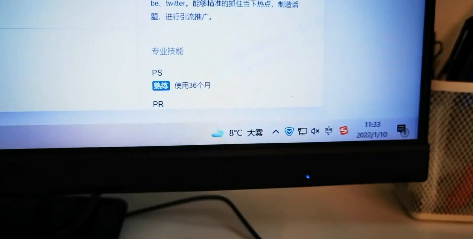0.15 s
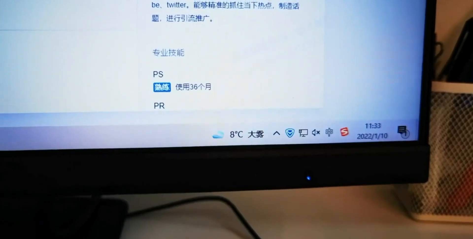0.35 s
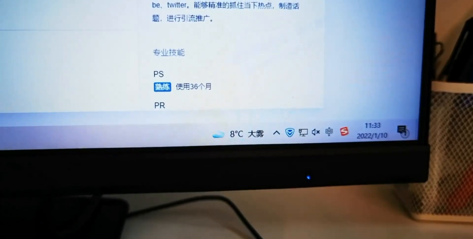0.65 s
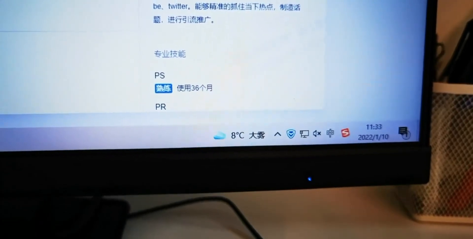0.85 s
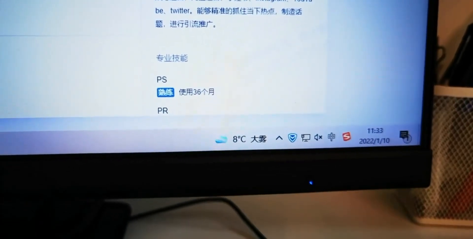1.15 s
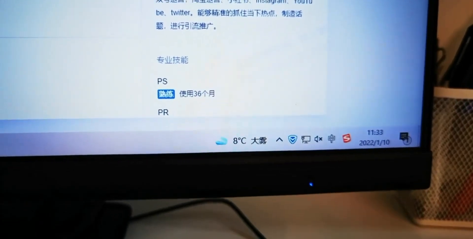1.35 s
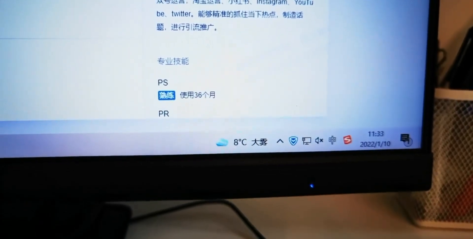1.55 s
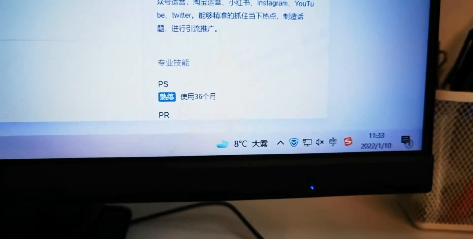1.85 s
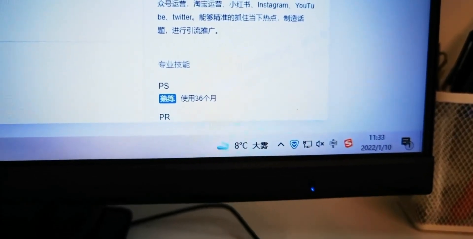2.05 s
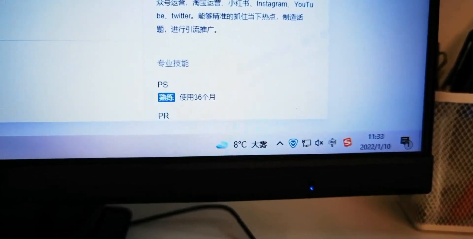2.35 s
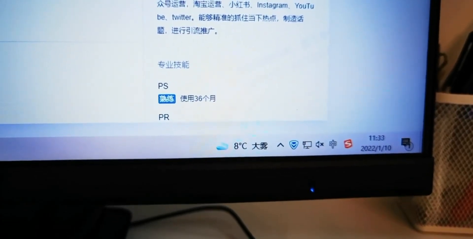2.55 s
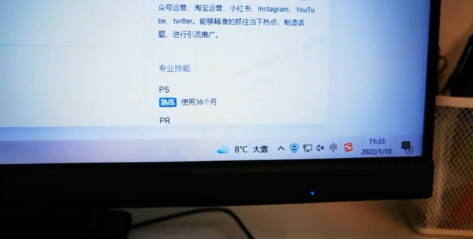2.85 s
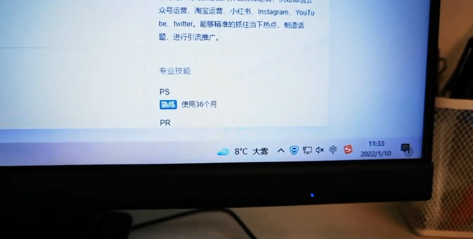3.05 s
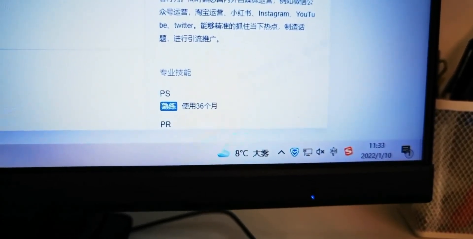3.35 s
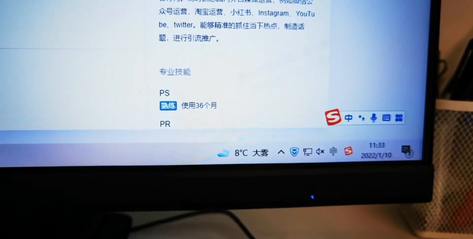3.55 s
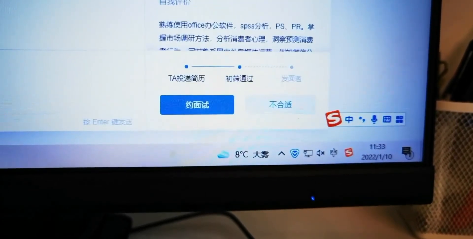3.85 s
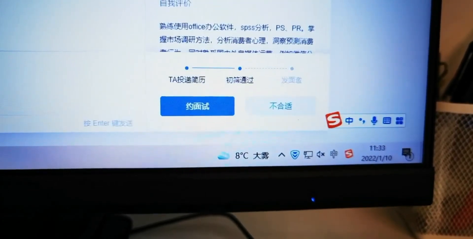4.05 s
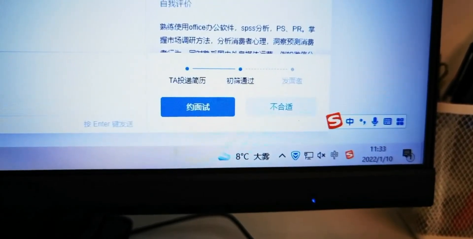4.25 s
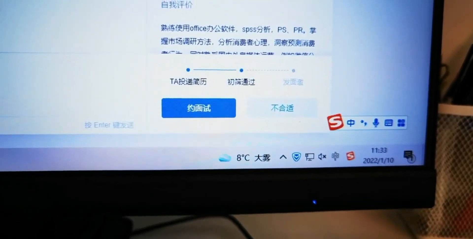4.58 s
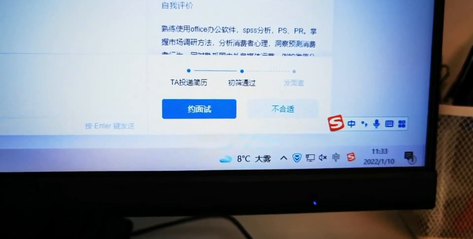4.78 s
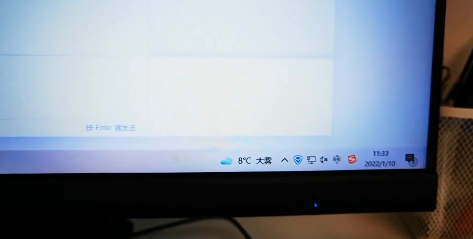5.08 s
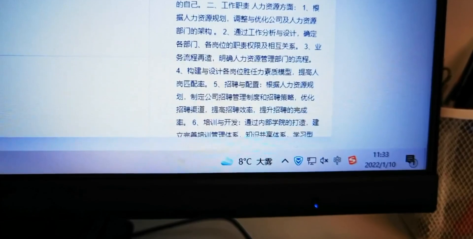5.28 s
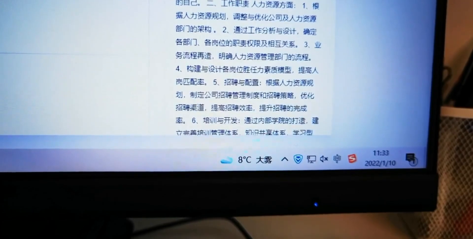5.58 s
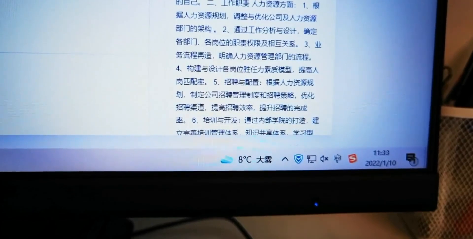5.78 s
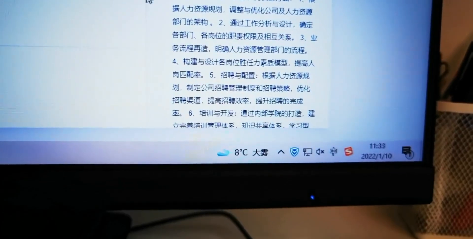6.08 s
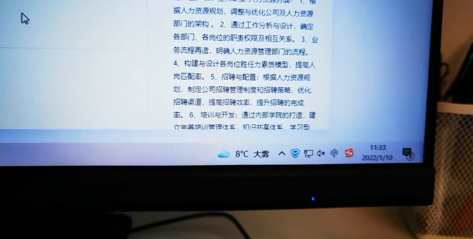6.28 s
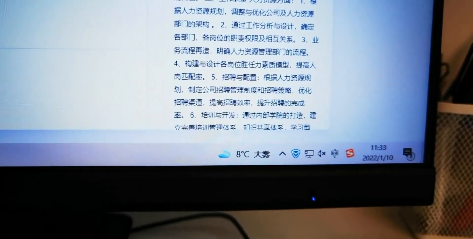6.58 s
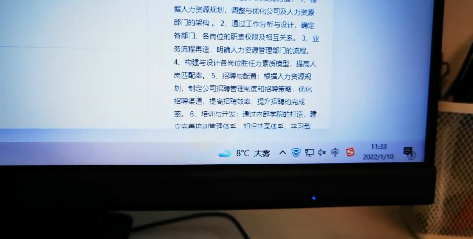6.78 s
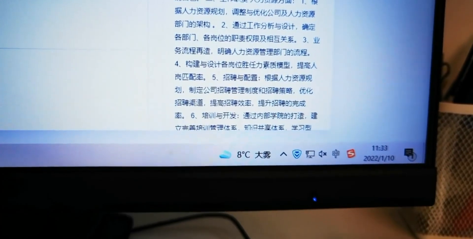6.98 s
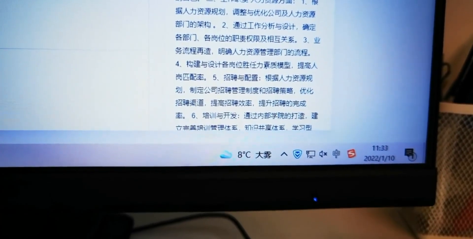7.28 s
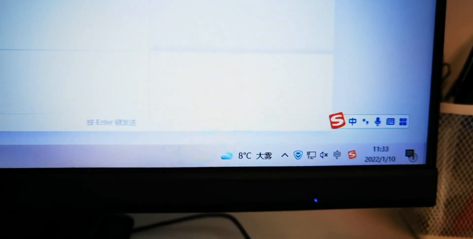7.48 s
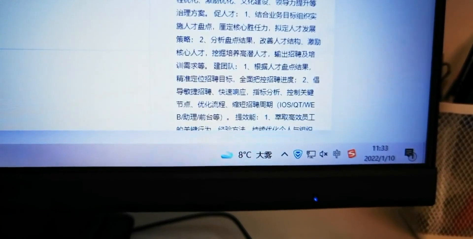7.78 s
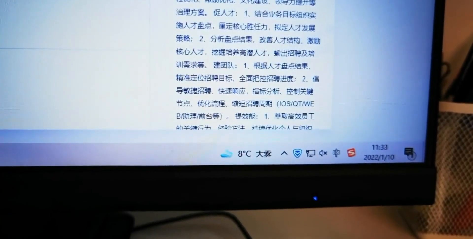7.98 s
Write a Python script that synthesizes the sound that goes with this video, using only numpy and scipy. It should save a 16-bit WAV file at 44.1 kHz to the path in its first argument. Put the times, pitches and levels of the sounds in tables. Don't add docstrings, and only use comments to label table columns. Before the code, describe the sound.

Four sharp computer mouse clicks, evenly spaced about two seconds apart, with soft sliding on a desk over a low steady office hum.

```python
import sys
import numpy as np
from scipy import signal
from scipy.io import wavfile
from scipy.ndimage import uniform_filter1d, minimum_filter1d

SR = 44100
rng = np.random.default_rng(int(sys.argv[2]) if len(sys.argv) > 2 else 0)


def int16_out(signal):
    q = np.round(np.clip(np.atleast_2d(signal).T, -1, 1) * 32767)
    wavfile.write(sys.argv[1], SR, q.astype(np.int16))


def amplitude_ratio(level_db):
    exponent = np.asarray(level_db, float) / 20
    return 10 ** exponent


N = 358488

# f/Hz, level/dB per Hz
AIR_SPECTRUM = [(20, -24), (45, -11.5), (70, -14), (100, -3), (220, -8), (330, -9), (600, -25.5),
                (800, -24), (1300, -30.5), (3800, -39), (6400, -39.5), (8700, -32), (11300, -42.5),
                (13000, -57), (15600, -54)]
# t/s, level/dB
AIR_LEVEL = [(0.45, -53.5), (0.55, -52), (1.15, -55), (1.37, -51.5), (2.01, -54.5), (2.76, -53.5),
             (2.86, -54.5), (4.87, -56), (4.98, -56), (6.86, -55), (6.98, -56.5), (8.12, -57.5)]
# f/Hz, width/Hz, level/dB
HUM = [(46.8, 15, -67), (99.6, 9, -60), (162.5, 6.4, -63), (258.3, 6.8, -72), (412, 25, -73),
       (516, 5.4, -74), (552.5, 6.6, -81), (681, 26, -84), (808, 30, -84)]
# f/Hz, correlation/1
PORT_LIKENESS = [(30, .93), (170, .93), (400, .82), (800, .5), (1200, .3), (5400, .12), (6900, .88),
                 (8400, .98), (15000, .98)]
# f/Hz, phase/rad
PORT_LAG = [(20, 0), (200, 0), (300, .3), (500, 1.1), (800, 1.3), (1100, 2.8), (2400, 6.28), (16000, 6.28)]
# f/Hz, left-right/dB
AIR_TILT = [(60, -7), (150, 1.5), (380, -1), (950, -1.5), (2380, 1), (5980, 4), (15000, -4.5)]
# f/Hz, t60/s
OFFICE_T60 = [(2000, 0.59), (5000, 0.23), (8400, 0.24), (11000, 0.21), (14000, 0.22)]

# t/s, half width/s, level/dB
BOOMS = [
    (1.27, .06, -56),
    (1.43, 0.12, -54.5),
    (2.25, .15, -59.5),
    (5.25, .08, -60),
    (6.6, 0.096, -63.5),
]
# f/Hz, width/Hz, level/dB
DESK_MODES = [(110, 80, 1.5), (300, 230, -4)]

# t/s, length/s, rub level/dB, dull part under it/dB, left-right/dB
STROKES = [(-.1, .3, -69, -5, 3), (0.311, 0.26, -67.5, -11.5, 9.5), (0.485, 0.52, -80.5, -0.5, 2),
           (0.872, 0.25, -80, 5.5, 0), (1.091, 0.095, -65, -6, 3.5), (1.128, 0.4, -62.5, -14.5, 12),
           (1.397, 0.1, -67.5, -11.5, 20), (1.515, 0.078, -78.5, -12.5, 12.5), (1.71, 0.58, -82, -6, 7),
           (2.043, 0.51, -58.5, -9.5, 5), (2.658, 0.35, -79.5, -9, 5), (3.075, 0.28, -61.5, -13.5, 13),
           (3.395, 0.22, -74.5, -12, 2), (3.584, 0.17, -80, -4.5, 7.5), (3.793, 0.34, -95.5, 1, 4.5),
           (4.357, 0.32, -87, -3, 1), (4.8, 0.23, -86.5, 0.5, -0.5), (5.134, 0.12, -66, -2.5, 0.5),
           (5.566, 0.27, -70, -6.5, 4.5), (6.068, 0.36, -61.5, -16.5, 11.5), (6.364, 0.3, -67, -5.5, 6.5),
           (6.506, 0.41, -64, -7, 3.5), (6.928, 0.12, -85.5, -2, 3), (7.132, 0.14, -63, -8.5, 3.5),
           (7.331, 0.28, -73.5, -19.5, 3.5)]
# t/s, level/dB
CATCHES = [(.892, -68), (1.958, -72), (3.11, -69), (4.544, -68), (4.776, -85.5), (5.306, -71),
           (6.012, -80.5), (6.562, -56.5), (6.598, -63.5), (7.214, -60), (7.825, -71), (7.933, -69),
           (2.915, -66), (5.026, -60.5), (7.005, -66), (.996, -66.5)]
# f/Hz, width/Hz, level/dB
RUB_MODES = [(7230, 310, -2.5), (7710, 170, -0.5), (8685, 1200, 4.5), (10000, 4500, -22.5),
             (11200, 450, -28), (14050, 1557, -41)]
# f/Hz, width/Hz, level/dB
DULL_RUB_MODES = [(5320, 490, 4.5), (6020, 970, 2), (5200, 1200, -20.5), (2420, 9500, -9)]
# f/Hz, width/Hz, level/dB
SQUEAK_MODES = [(5760, 160, 0), (6450, 300, -11), (5400, 400, -10)]
STROKE_SKEW, STROKE_ROUND = 0.71, 1.69
CATCH_S = 0.0055
SQUEAK_S, SQUEAK_WIDTH_S, SQUEAK_DB = 3.665, .055, -69.5
REST_DB, REST_DULL_DB, REST_PAN_DB, TREMBLE_DB = -84.5, 1.5, 4, 1.5
FLUTTER_DB, FLUTTER_S = 3, .02
RUB_TOP_HZ = 11400

# t/s, f/Hz, width/Hz, peak level/dB, t60/s
RINGS = [
    (1.092, 5300, 1100, -53.5, 0.4),
    (3.022, 5260, 1100, -54.5, 0.39),
    (5.13, 5440, 1500, -50, 0.35),
    (7.123, 5280, 630, -52.5, 0.38),
    (2.9265, 8450, 500, -26, 0.047),
    (2.933, 8450, 500, -41.5, 0.45),
    (1.092, 8800, 1230, -47.5, .4),
    (3.022, 8900, 1000, -45.5, .4),
    (5.033, 2950, 300, -67, .2),
    (1.03, 8350, 600, -46, 0.26),
]
# t/s, f/Hz, width/Hz, peak level/dB, t60/s
FIZZ = [
    (1.092, 12500, 2500, -62, .15),
    (2.929, 13800, 2600, -56, .16),
    (3.02, 13200, 2500, -56, .13),
    (5.034, 12000, 2000, -64, .1),
    (5.128, 13200, 2500, -62, .1),
    (7.015, 13300, 2800, -54, .14),
    (7.122, 13500, 2500, -58, .13),
    (2.1, 14200, 1500, -78, 2.5),
    (7.2, 12800, 2000, -68, .25),
    (6.41, 14500, 1800, -79, 2.5),
]
RING_RISE_MS = 1.3

# t/s, peak level/dB, ring under it/dB, ring t60/s
THUDS = [(.472, -64, -20, .1), (1.0004, -59, -5, 0.22), (1.343, -66, -22, 0.091), (1.565, -64, -20, .1),
         (2.923, -54.5, -2, 0.27), (3.0132, -58, -10, 0.35), (3.088, -63, -15, 0.11),
         (4.774, -65.5, -7, 0.15), (5.028, -53, -1, 0.34), (5.1217, -69, -20, .2), (5.725, -66, -13, .1),
         (6.011, -72.5, -21, 0.091), (6.3948, -57.5, -15, .15), (7.008, -58, -3, 0.34),
         (7.115, -64, -14, 0.17)]
# t/s, peak level/dB, shell share/dB, lever share/dB
FLICKS = [(1.2, -62.5, -5, 25), (1.0728, -62.5, -5, 27), (0.98, -67, -5, 27), (7.0132, -33.5, 6, 30),
          (7.8, -53, 2, 23), (1.0995, -48, 0, 1), (3.3, -62, -5, 28.5), (7.1125, -43.5, 4.5, 6),
          (7.1142, -35, 4, 7), (7.1208, -34, 8, 3), (5.0225, -59.5, 0.5, 22.5), (7.0205, -42, -5, -5.5),
          (2.9345, -39.5, -5, 3), (7.2165, -46.5, 4, 8)]
# f/Hz, width/Hz, level/dB
HOLLOW_MODES = [(3220, 880, -2.5), (1900, 1200, -10.5), (3900, 1900, -3.5), (1208, 890, -6.5)]
THUD_MS = 3.1

# f/Hz, width/Hz, level/dB
SWITCH_MODES = [(8370, 450, 4), (8814, 1040, -3.5), (9770, 2300, -19.5), (8020, 1600, -4)]
# f/Hz, width/Hz, level/dB
SHELL_MODES = [(4886, 410, -17), (5580, 2300, -18.5), (6420, 2400, -17.5), (6930, 440, -26),
               (2914, 209, -34.5)]
# f/Hz, width/Hz, level/dB
LEVER_MODES = [(11220, 570, -28.5), (13140, 960, -38.5), (13890, 2000, -44.5), (15300, 1200, -49.5)]
SMALL_PARTS_HZ = 4550
LEAD_IN_S = .003

# t/s, peak level/dB, shell share/dB, left-right/dB, lever share/dB
TICKS = [(0.2696, -49.5, 10.5, 10, -16.5), (0.4714, -39.5, 12, 16, 4.5), (1.1537, -46, 18, 6, 12),
         (1.2303, -53, -3, 12.5, -13), (1.3435, -35, 3, 16, 17.5), (1.379, -43, -1, 21, -11.5),
         (1.3998, -53, 2, 18, -8), (1.5647, -36.5, 9, 8, -14), (1.958, -64, 6.5, 4, -3),
         (3.0899, -33, 22.5, 14.5, -9), (4.5438, -63, 5, 2, -2.5), (4.7742, -56, 8, 23, -3),
         (5.6242, -58, 13, 9, -6), (5.727, -43.5, 8, 10, -11.5), (6.011, -53.5, 7, 9.5, 3),
         (6.3942, -34.5, 11, 15, -4), (6.5702, -33, 5, 11.5, -12), (7.219, -38, 6.5, 9, -1),
         (7.424, -56, 10, 26, -1.5)]
TICK_MS = 1.42

# t/s, peak level/dB, shell under switch/dB, lever under switch/dB
BOUNCES = [(1.0837, -19, -15, -36), (1.0846, -19, -5, -29), (1.0855, -15, -13, -30),
           (1.0868, -10, -16, -42), (1.0874, -14, -16, -36), (1.0883, -17, -14, -39),
           (1.0896, -29, -18, -40), (3.0139, -22, -9, -19), (3.015, -14, 0, -23), (3.0159, -10, -19, -32),
           (3.0166, -14, -12, -23), (3.0179, -16, -16, -31), (3.0194, -21, -18, -35),
           (3.0206, -22, -27, -41), (3.0218, -29, -16, -34), (5.121, -29, -22, -25),
           (5.1223, -28, -13, -22), (5.1231, -15, -22, -27), (5.1239, -12, -21, -24),
           (5.1246, -11, -12, -27), (5.1258, -10, -19, -31), (5.1277, -19, -14, -37),
           (5.1298, -30, -22, -38), (7.1165, -22, 3, -19), (7.1174, -10, -12, -31), (7.1188, -24, -2, -21),
           (7.1198, -23, -15, -21), (6.3952, -21, -4, -35), (6.3959, -26, 2, -27), (6.3982, -32, -12, -46),
           (6.5697, -31, -24, -26), (6.5715, -20, -10, -27), (6.5722, -16, -15, -37),
           (6.5729, -21, -25, -42), (6.5746, -29, -18, -33), (6.5762, -37, -25, -34),
           (2.9221, -22, -4, -31), (2.9232, -21, -1, -18), (7.0066, -44, -16, -25), (7.0084, -27, 0, -24)]
# f/Hz, width/Hz, level/dB
CONTACT_SWITCH = [(8450, 1600, 0), (9700, 1800, -6.5)]
# f/Hz, width/Hz, level/dB
CONTACT_SHELL = [(5100, 950, 0), (6300, 1500, -4.5)]
# f/Hz, width/Hz, level/dB
CONTACT_LEVER = [(11300, 1600, 0), (13600, 3000, -4.5)]
BOUNCE_TRIM_DB, BOUNCE_SHELL_DB, BOUNCE_LEVER_DB, BOUNCE_PAN_DB = -6.5, 1.5, 4.5, 12.5
BOUNCE_RISE_S, FAR_PORT_S = .0002, .00016

# t/s, peak level/dB, shell share/dB, lever share/dB, time factor/1
RELEASES = [
    (1.084, -35, 7, -2, 0.9),
    (3.0135, -25, 3, 6, 1.5),
    (5.1227, -24, 0.5, 4, 1.15),
    (7.1161, -32, -3, 4.5, 0.6),
]
# f/Hz, width/Hz, level/dB
CLACK_MODES = [(5150, 800, 0)]
CHATTER_TOP_MS, CHATTER_WIDTH_MS, CHATTER_LEAD_DB = 2, 2.5, -18
RELEASE_PAN_DB, CLACK_DB, CLACK_LATE_S = 11.5, -6, .0018

# t/s, peak level/dB, left-right/dB, rebound/dB, hold as a time factor/1
PRESSES = [
    (1.0013, -17, 16, -16.5, 1.48),
    (1.0437, -39, 16, -11, 0.88),
    (2.924, -16, 8, 6, 0.55),
    (5.029, -14.5, 7.5, 8.5, 1.1),
    (7.0091, -16, 15.5, 3.5, 1.2),
    (7.051, -36.5, 15, -11, 1.1),
]
# f/Hz, width/Hz, level/dB
KNOCK_MODES = [(3000, 350, 0), (1900, 900, -9), (4200, 900, -5)]
KNOCK_DB, KNOCK_MS = -55, 2.5
SPRING_HZ, SPRING_RISE_MS, SPRING_HOLD_MS = 8360, .8, 3.0
SPRING_SAG_DB_PER_MS, SPRING_STOP_DB_PER_MS = 1.5, 17
REBOUND_MS, REBOUND_DB, REBOUND_FADE_DB_PER_MS = 4.9, -14, 2.2

# t/s, level/dB
MUTE = [(0, -2), (.061, -3), (.063, -18), (.088, -62), (.236, -62), (.243, -20), (.27, -7), (.3, 0),
        (.36, 4), (.45, 2)]
# f/Hz, share/%
GATE_FLOOR = [(20, 0), (10700, 0), (11400, 55), (11900, 88), (12900, 90), (13300, 55), (15500, 62),
              (16000, 90)]
# f/Hz, level/dB
GATE_MASK = [(20, -95), (700, -80), (1300, -60), (3300, -60), (4500, -75), (16000, -75)]
GATE_FROM_S, SPLIT_HZ = .33, 1000


def evened(x):
    return x / np.sqrt(np.mean(x ** 2) + 1e-20)


def read(points, hz):
    f, value = np.transpose(points)
    return np.interp(np.log(hz + 1), np.log(f + 1), value)


def level_over_time(rows):
    s, db = np.transpose(rows)
    return np.interp(np.arange(N) / SR, s, db)


def resonate(x, hz, width):
    turn = np.exp(2j * np.pi * hz * np.arange(x.shape[-1]) / SR)
    r = np.exp(-np.pi * width / SR)
    slow = signal.lfilter([(1 - r) ** 2], [1, -2 * r, r * r], x / turn)
    return 2 * (turn * slow).real


def body(x, modes):
    return sum((-1) ** k * amplitude_ratio(db) * resonate(x, hz, width) for k, (hz, width, db) in enumerate(modes))


def flutter(x, modes):
    slow = uniform_filter1d(rng.standard_normal((len(modes), N)), round(FLUTTER_S * SR))
    sway = amplitude_ratio(FLUTTER_DB * evened(slow))
    return evened(sum((-1) ** k * sway[k] * body(x, [mode]) for k, mode in enumerate(modes)))


def add(mix, s, sound, db, pan_db):
    side = amplitude_ratio(np.array([[0], [-pan_db]]))
    sound = sound / abs(sound).max(1, keepdims=True) * amplitude_ratio(db + 6) * side
    part = mix[:, round(s * SR):][:, :sound.shape[1]]
    part += sound[:, :part.shape[1]]


def hum_line(hz, width, db):
    step = 32
    r = np.exp(-np.pi * width * step / SR)
    a, b = rng.standard_normal((2, N // step + 2))
    slow = signal.lfilter([1 - r], [1, -r], a + 1j * b) + .15
    slow = np.interp(np.arange(N) / step, np.arange(len(a)), slow)
    tone = evened((slow * np.exp(2j * np.pi * hz * np.arange(N) / SR)).real)
    late = round(read(PORT_LAG, hz) / (2 * np.pi * hz) * SR)
    return amplitude_ratio(db + 54.0) * np.array([tone, np.roll(tone, late)])


def office_air():
    frames, hz = N // 512 + 6, np.fft.rfftfreq(2048, 1 / SR)
    a, b, c, d, patches = rng.standard_normal((frames, 1025, 5)).T
    patches = evened(uniform_filter1d(uniform_filter1d(patches, 20, 0), 5, 1))
    same = np.clip(read(PORT_LIKENESS, hz), -1, 1)[:, None]
    left = a + 1j * b
    lag = np.exp(-1j * read(PORT_LAG, hz))[:, None]
    right = same * left * lag + np.sqrt(1 - same ** 2) * (c + 1j * d)
    patch_db = (1.5 + 0.56 * (hz > 11500))[:, None] * patches
    z = np.array([left, right]) * amplitude_ratio(read(AIR_SPECTRUM, hz)[:, None] + patch_db)
    z *= amplitude_ratio(np.array([.5, -.5])[:, None] * read(AIR_TILT, hz))[:, :, None]
    wash = evened(signal.istft(z, nperseg=2048, noverlap=1536)[1][:, :N])
    waver = amplitude_ratio(1.4 * evened(uniform_filter1d(rng.standard_normal(N), 9000)))
    hum = waver * sum(hum_line(*line) for line in HUM)
    return amplitude_ratio(level_over_time(AIR_LEVEL) - 1) * (amplitude_ratio(-2.0) * wash + hum)


def office_reflections(x):
    taps = np.zeros((2, SR // 2))
    slots = np.arange(260, SR // 2 - 20, 20)
    at = slots + rng.integers(0, 20, (2, len(slots)))
    np.put_along_axis(taps, at, rng.choice([-1., 1.], at.shape), 1)
    hz, t, z = signal.stft(taps, SR, nperseg=256)
    decay_db = -60 * t / read(OFFICE_T60, hz)[:, None] + 1.5 * (hz > 11500)[:, None]
    tail = signal.istft(z * amplitude_ratio(decay_db), SR, nperseg=256)[1]
    tail *= amplitude_ratio(np.array([[-14.], [-18.]])) / np.linalg.norm(tail[0])
    return signal.fftconvolve(x[:1], tail, axes=1)[:, :N]


def desk():
    t = np.arange(N) / SR
    weight = sum(amplitude_ratio(db) * np.exp(-((t - s) / width) ** 2) for s, width, db in BOOMS)
    return weight * evened(body(rng.standard_normal(N), DESK_MODES))


def glide():
    t = np.arange(N) / SR
    near, other, rough, tremble = rng.standard_normal((4, N))
    rub = amplitude_ratio(REST_DB + TREMBLE_DB * evened(uniform_filter1d(tremble, 3000)))
    dull = rub * amplitude_ratio(REST_DULL_DB)
    sided = rub * REST_PAN_DB
    for s, db in CATCHES:
        catch = amplitude_ratio(db) * np.exp(-((t - s) / CATCH_S) ** 2)
        rub = rub + catch
        sided = sided + catch * REST_PAN_DB
    for s, length, db, dull_db, pan_db in STROKES:
        phase = np.clip((t - s) / length, 0, 1) ** STROKE_SKEW
        speed = amplitude_ratio(db) * abs(np.sin(np.pi * phase)) ** STROKE_ROUND
        rub = rub + speed
        dull = dull + speed * amplitude_ratio(dull_db)
        sided = sided + speed * pan_db
    pan = sided / rub
    fine, coarse = [evened(uniform_filter1d(rough, size)) for size in (300, 1500)]
    grit = amplitude_ratio(.7 * fine + .4 * coarse)
    rub = rub * flutter(grit * near, RUB_MODES) * amplitude_ratio(np.array([pan, -pan]) * 0.46)
    dull = dull * flutter(grit * np.array([near, other]), DULL_RUB_MODES) * amplitude_ratio(np.array([pan, -pan]) / 2)
    squeak = amplitude_ratio(SQUEAK_DB - 10 * ((t - SQUEAK_S) / SQUEAK_WIDTH_S) ** 2) * grit
    squeak = squeak * evened(body(near, SQUEAK_MODES))
    rub_low_pass = signal.butter(4, RUB_TOP_HZ, fs=SR, output="sos")
    return signal.sosfilt(rub_low_pass, rub + dull + squeak * amplitude_ratio(np.array([[3.], [-3.]])))


def rings():
    out, ms = np.zeros((2, N)), np.arange(9000) / SR * 1000
    for s, hz, width, db, t60 in RINGS + FIZZ:
        near, other = rng.standard_normal((2, len(ms)))
        fade_out = np.clip((ms[-1] - ms) / 40, 0, 1)
        force = np.clip(ms / RING_RISE_MS, 0, 1) * amplitude_ratio(-60 * ms / 1000 / t60) * fade_out
        ports = np.array([near, 0.55 * near + 0.89 * other])
        add(out, s, force * resonate(ports, hz, width), db, 6.0)
    return out


def rattle(force, shell_db, lever_db, per_s):
    near, other, when = rng.standard_normal((3, len(force)))
    taps = (abs(when) < per_s / SR * 1.25) * force
    taps = np.array([near, 0.25 * other + 0.14 * near]) * taps + 1e-4 * force
    switch = body(taps, SWITCH_MODES)
    shell = amplitude_ratio(shell_db) * body(taps, SHELL_MODES)
    lever = amplitude_ratio(lever_db + np.array([[0], [5.0]])) * body(taps, LEVER_MODES)
    small = signal.butter(8, SMALL_PARTS_HZ, "high", fs=SR, output="sos")
    return signal.sosfilt(small, switch + shell + lever)


def knocks():
    out, ms = np.zeros((2, N)), np.arange(6000) / SR * 1000
    for s, db, ring_db, t60 in THUDS:
        ring = amplitude_ratio(ring_db - 60 * ms / 1000 / t60)
        force = np.clip(ms / THUD_MS, 0, 1) * (np.exp(-ms / THUD_MS) + ring)
        add(out, s - .001, body(force * rng.standard_normal((2, len(ms))), HOLLOW_MODES), db, 3.0)
    ms = ms[:600]
    for s, db, shell_db, lever_db in FLICKS:
        force = np.minimum(ms / .6, 1) * np.exp(-ms / 0.91)
        add(out, s, rattle(force, shell_db, lever_db, 12000), db, 9.0)
    return out


def contact_time():
    ms = np.arange(1300) / SR * 1000 - LEAD_IN_S * 1000
    return ms, (ms < 0) * amplitude_ratio(-15 + 5.0 * ms)


def ticks():
    out, (ms, scuff) = np.zeros((2, N)), contact_time()
    for s, db, shell_db, pan_db, lever_db in TICKS:
        force = scuff + np.clip(ms / 0.37, 0, 1) * np.exp(-ms / TICK_MS)
        add(out, s - LEAD_IN_S, rattle(force, shell_db, lever_db, 12000), db, pan_db)
    return out


def bounces():
    out = np.zeros((2, N))
    blow = 1. * (np.arange(300) == np.array([[0], [round(FAR_PORT_S * SR)]]))
    parts = [body(body(blow, modes), modes) for modes in (CONTACT_SWITCH, CONTACT_SHELL, CONTACT_LEVER)]
    switch, shell, lever = [part / abs(part).max() for part in parts]
    signs = rng.choice([-1., 1.], (len(BOUNCES), 2))
    for (s, db, shell_db, lever_db), sign in zip(BOUNCES, signs):
        ring = sign[0] * (switch + amplitude_ratio(lever_db + BOUNCE_LEVER_DB) * lever)
        ring = ring + sign[1] * amplitude_ratio(shell_db + BOUNCE_SHELL_DB) * shell
        add(out, s - BOUNCE_RISE_S, ring, db + BOUNCE_TRIM_DB, BOUNCE_PAN_DB)
    return out


def releases():
    out, (ms, _) = np.zeros((2, N)), contact_time()
    blow = np.ones((2, 1)) * (abs(ms) == abs(ms).min())
    clack = body(body(blow, CLACK_MODES), CLACK_MODES)
    for s, db, shell_db, lever_db, hold in RELEASES:
        u = ms / hold
        swell = amplitude_ratio(-10 * (abs(u - CHATTER_TOP_MS) / CHATTER_WIDTH_MS) ** 2)
        force = np.where(u < 0, amplitude_ratio(CHATTER_LEAD_DB + 2.4 * u), swell)
        add(out, s - LEAD_IN_S, rattle(force, shell_db, lever_db, 14000), db, RELEASE_PAN_DB)
        add(out, s - LEAD_IN_S + CLACK_LATE_S, clack, db + CLACK_DB, RELEASE_PAN_DB)
    return out


def presses():
    out, (ms, scuff) = np.zeros((2, N)), contact_time()
    blow = np.clip(ms / KNOCK_MS, 0, 1) * np.exp(-abs(ms) / KNOCK_MS) * rng.standard_normal((2, len(ms)))
    knock = body(blow, KNOCK_MODES)
    for s, db, pan_db, rebound_db, hold in PRESSES:
        u = ms / hold
        wobble_db = 1.1 * evened(uniform_filter1d(rng.standard_normal((2, len(ms))), 20))
        stop_db = SPRING_STOP_DB_PER_MS * np.maximum(u - SPRING_HOLD_MS, 0)
        first_db = -SPRING_SAG_DB_PER_MS * u - stop_db
        away_db = np.maximum(SPRING_STOP_DB_PER_MS * (REBOUND_MS - u), REBOUND_FADE_DB_PER_MS * (u - REBOUND_MS))
        again_db = REBOUND_DB + rebound_db - away_db
        swing = np.clip(u / SPRING_RISE_MS, 0, 1) ** 2 * amplitude_ratio(np.maximum(first_db, again_db) + wobble_db)
        cycles = SPRING_HZ * ms / 1000 + rng.random() - np.array([[0], [.2]])
        spring = swing * np.sin(2 * np.pi * cycles)
        spring = resonate(spring, SPRING_HZ, 3500)
        snap = rattle(1.9 * scuff + (ms >= 0) * np.exp(-ms / 7.3), 6.0, 3.3, 13000)
        snap_gain = 0.37 * amplitude_ratio(min(0.36 * (db + 19.0), 0))
        add(out, s - LEAD_IN_S, spring + snap_gain * snap / abs(snap).max(), db, pan_db)
        add(out, s - LEAD_IN_S, knock, db + KNOCK_DB, 3.0)
    return out


def scene():
    clicks = ticks() + bounces() + releases() + presses()
    background = office_air() + office_reflections(clicks) + desk()
    return background + glide() + rings() + knocks() + clicks


def gate(x):
    hz, t, z = signal.stft(x, SR, nperseg=1024, noverlap=512)
    band_db = 10 * np.log10(uniform_filter1d((abs(z) ** 2).mean(0), size=14, axis=0) + 1e-20)
    sudden_db = band_db - .8 * uniform_filter1d(band_db, size=25, axis=1)
    rank = 100 * sudden_db.argsort(1).argsort(1) / band_db.shape[1]
    keep = np.clip((rank - read(GATE_FLOOR, hz)[:, None]) / 6 + 1, .04, 1)
    keep = np.where(t < GATE_FROM_S, 1, keep)
    loudest_db = -minimum_filter1d(-band_db[40:].max(0), size=3, origin=1)
    chance_db = 8 * evened(uniform_filter1d(rng.standard_normal(band_db.shape), size=6, axis=0))
    chance_db = 8 * evened(uniform_filter1d(chance_db, size=4, axis=1))
    over_db = band_db - loudest_db - read(GATE_MASK, hz)[:, None] + chance_db
    keep *= np.clip(over_db / 8, .3, 1)
    return signal.istft(z * keep, SR, nperseg=1024, noverlap=512)[1][:, :N]


def roll_off(x):
    return signal.sosfilt(signal.butter(12, 16300, fs=SR, output="sos"), x)


def record(dry):
    power_db = 10 * np.log10(abs(uniform_filter1d((dry ** 2).mean(0), 130)) + 1e-12)
    fall = np.arange(N) * 340.0 / SR
    over_db = np.maximum(np.maximum.accumulate(power_db + fall) - fall + 37.0, 0)
    duck_db = np.roll(uniform_filter1d(0.54 * over_db, 150), 190)
    bass = signal.sosfiltfilt(signal.butter(2, SPLIT_HZ, fs=SR, output="sos"), dry)
    ducked_bass = bass * amplitude_ratio(-1.2 * np.roll(duck_db, -260))
    ducked = (dry - bass) * amplitude_ratio(-duck_db) + ducked_bass
    x = gate(ducked) * amplitude_ratio(level_over_time(MUTE))
    x = signal.sosfiltfilt(signal.butter(10, 16000, fs=SR, output="sos"), x)
    return roll_off(x)


dry = scene()
out = record(dry)
int16_out(out)
```